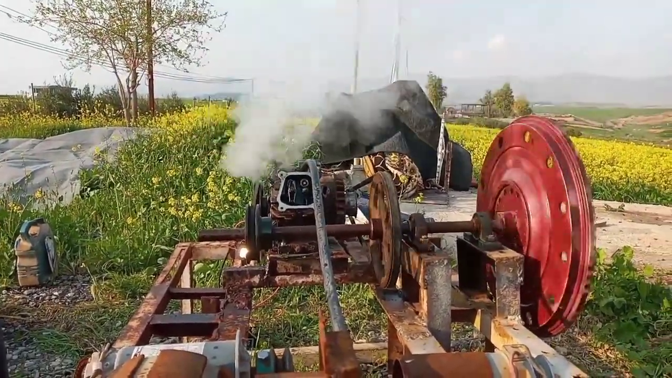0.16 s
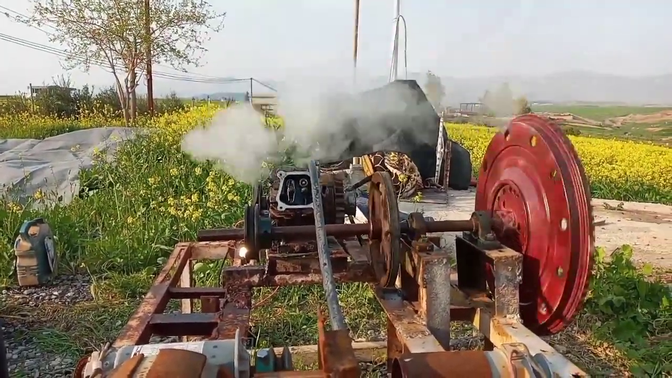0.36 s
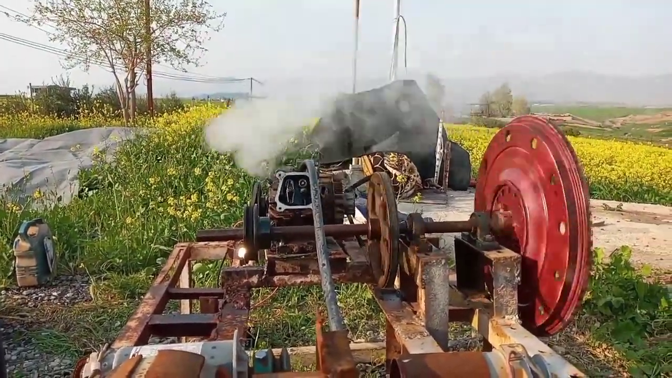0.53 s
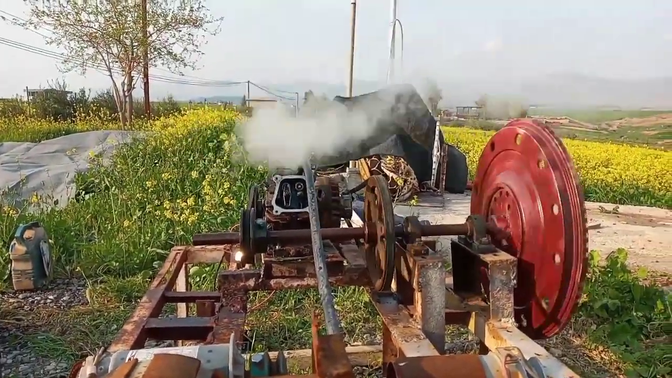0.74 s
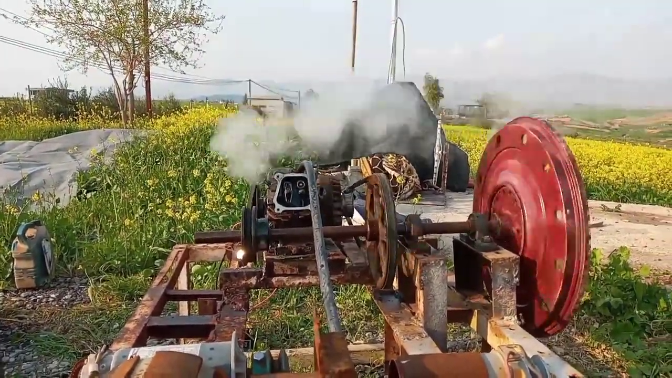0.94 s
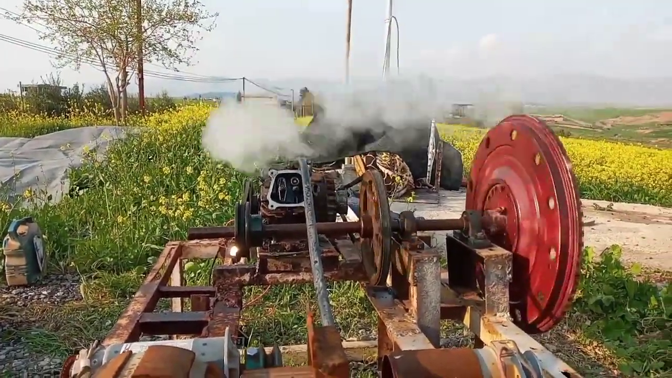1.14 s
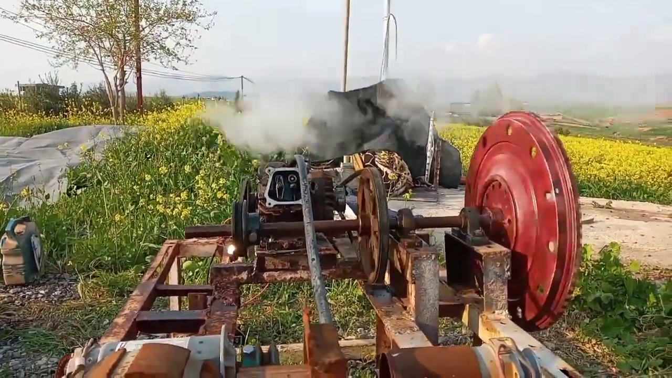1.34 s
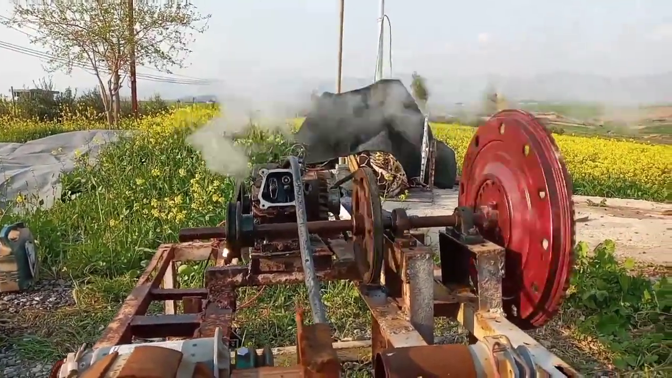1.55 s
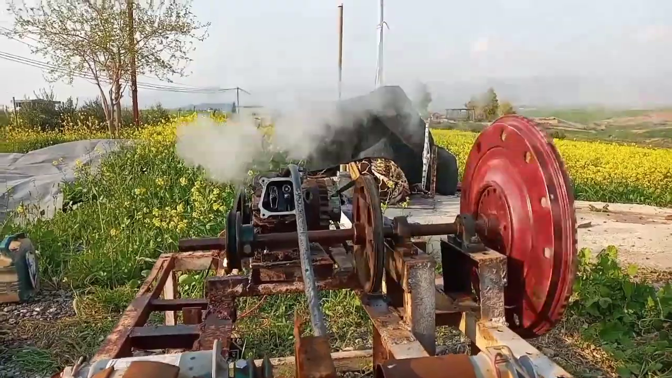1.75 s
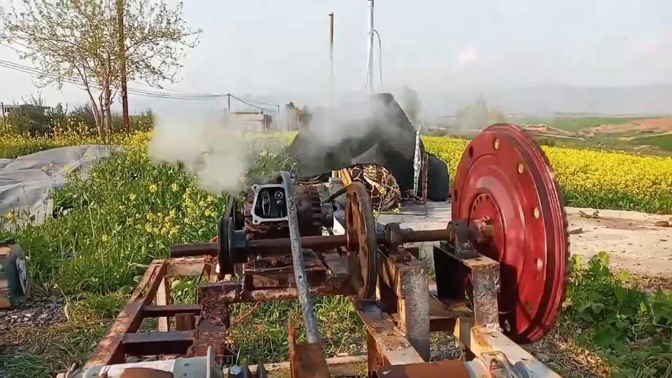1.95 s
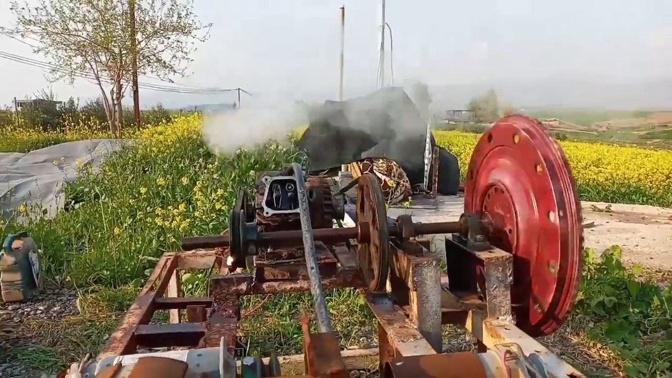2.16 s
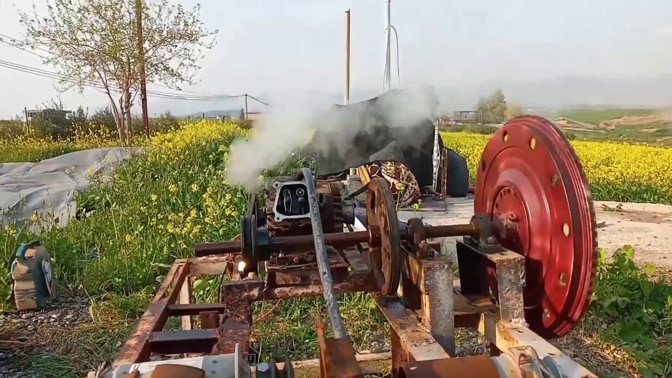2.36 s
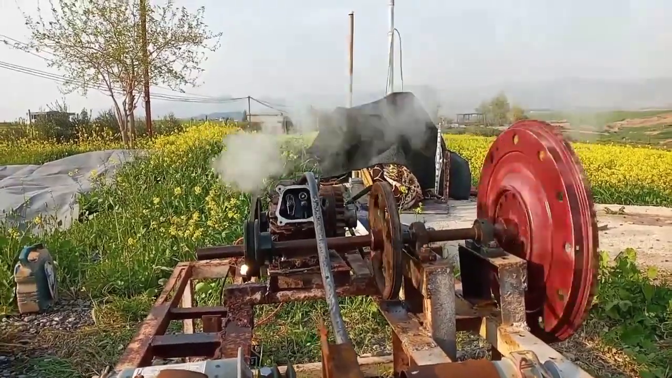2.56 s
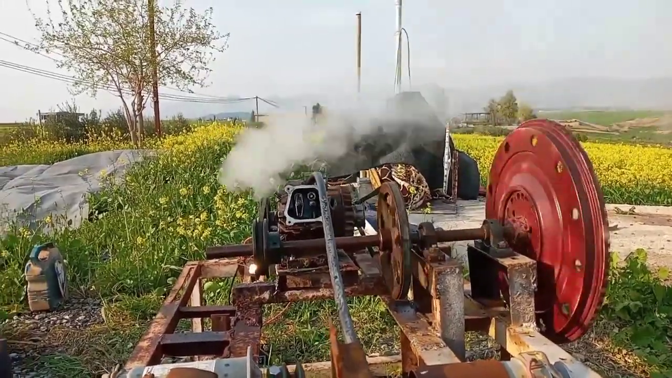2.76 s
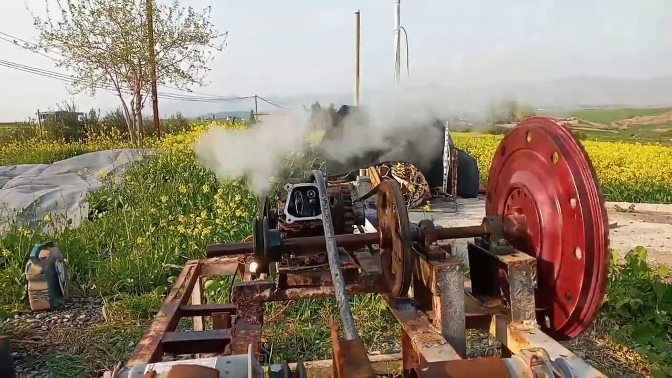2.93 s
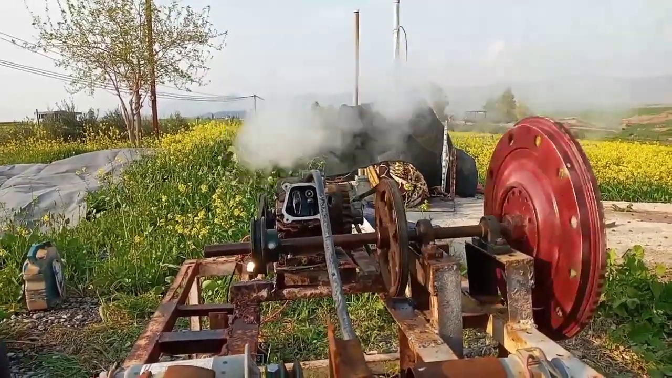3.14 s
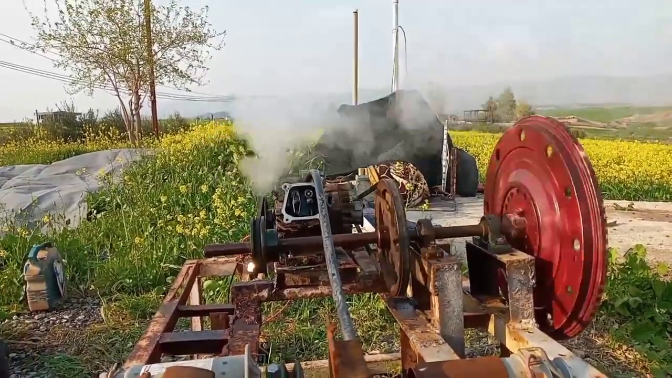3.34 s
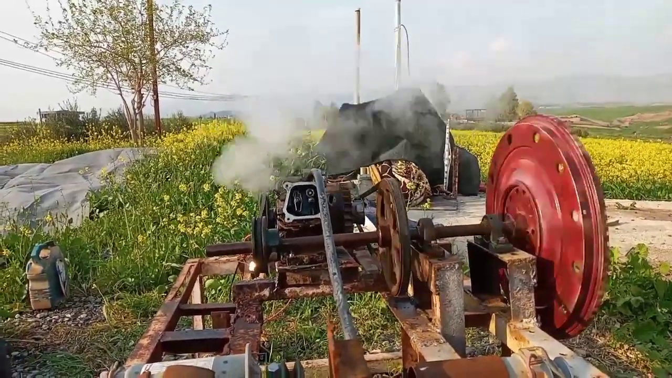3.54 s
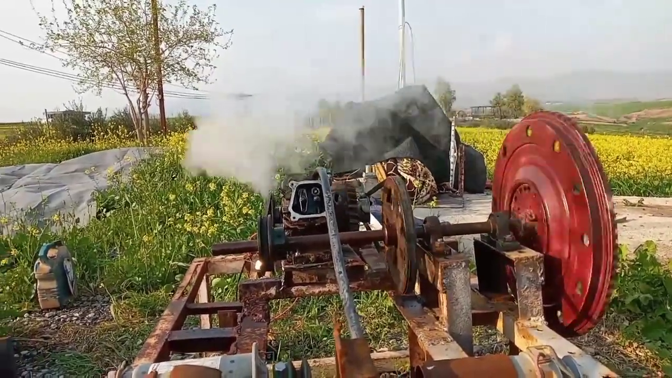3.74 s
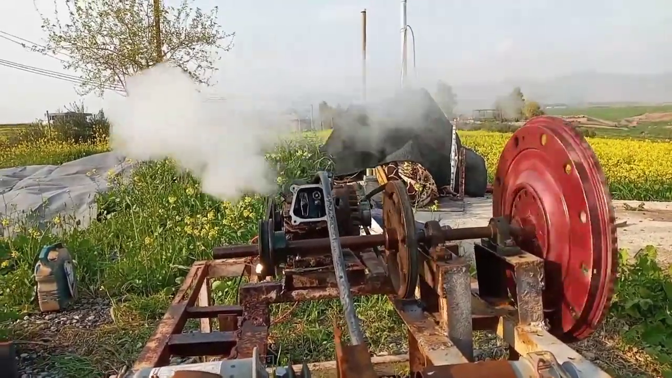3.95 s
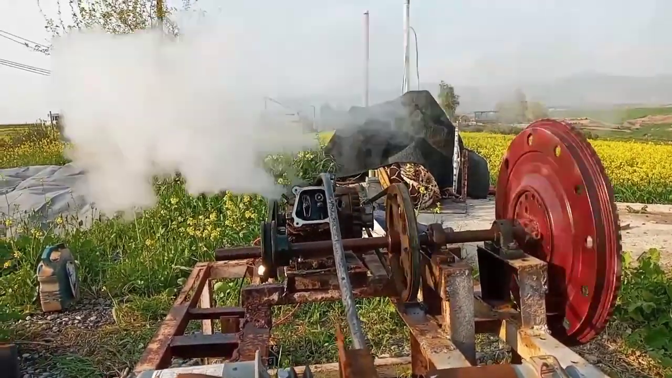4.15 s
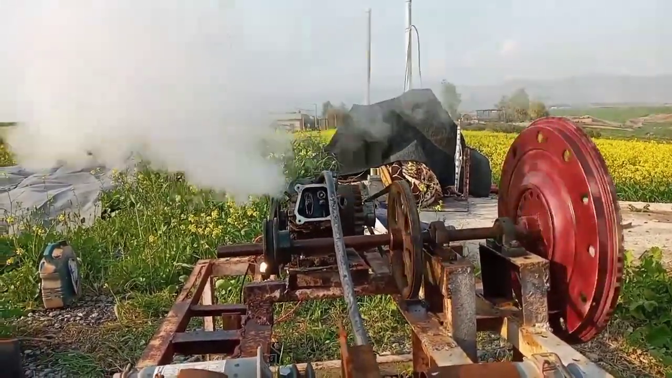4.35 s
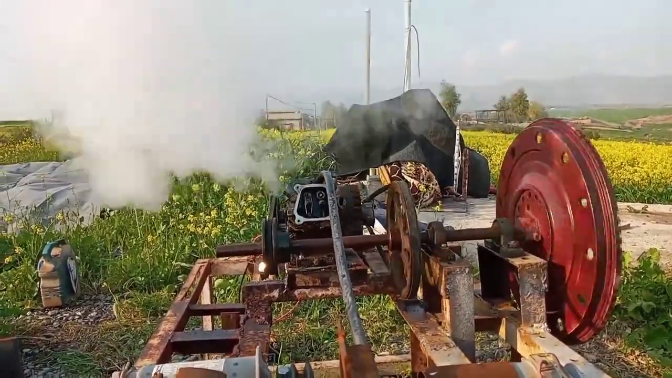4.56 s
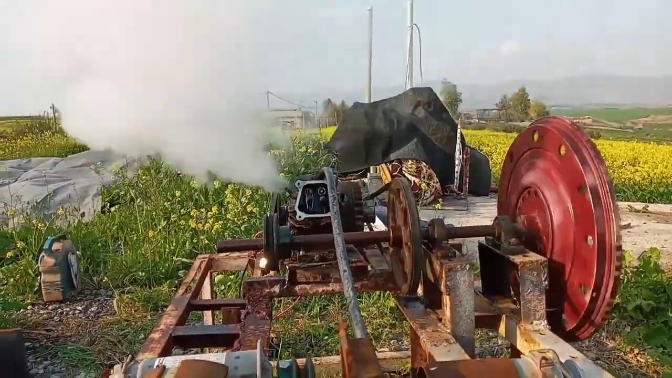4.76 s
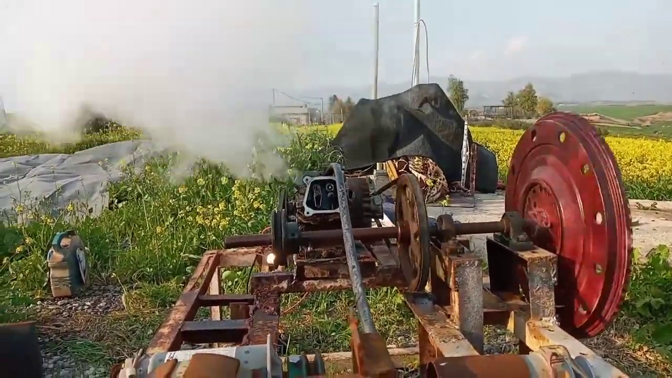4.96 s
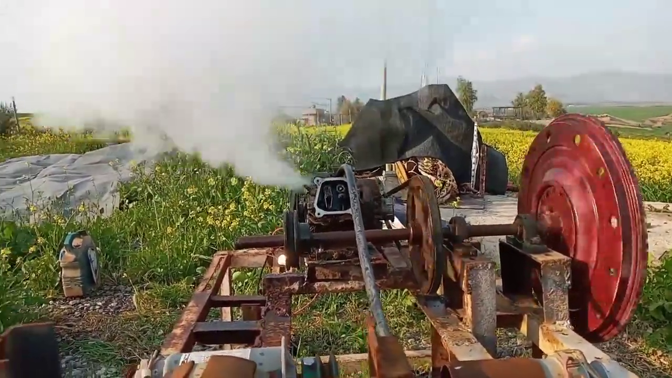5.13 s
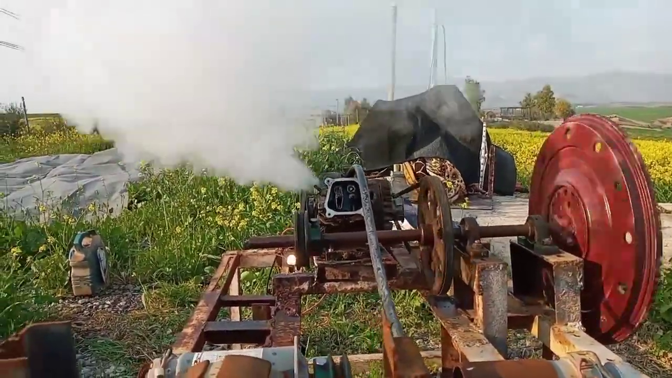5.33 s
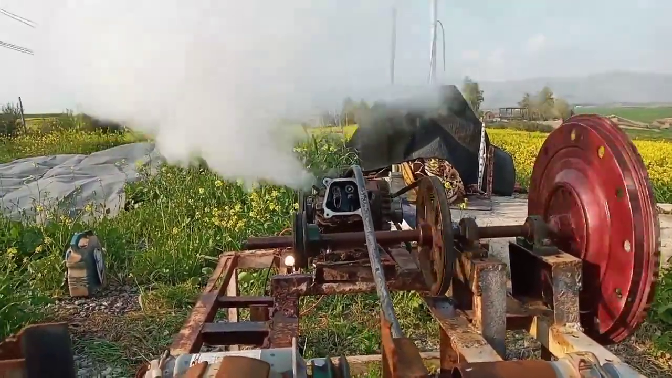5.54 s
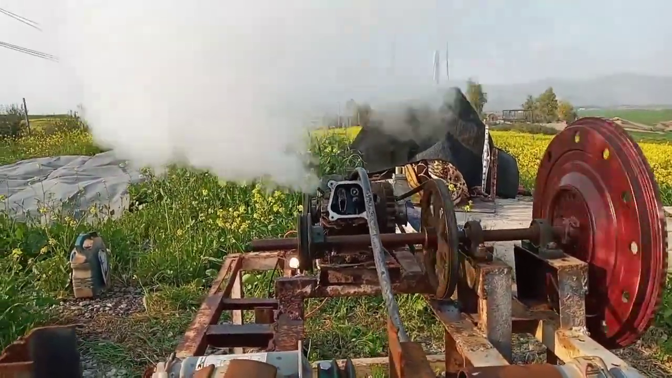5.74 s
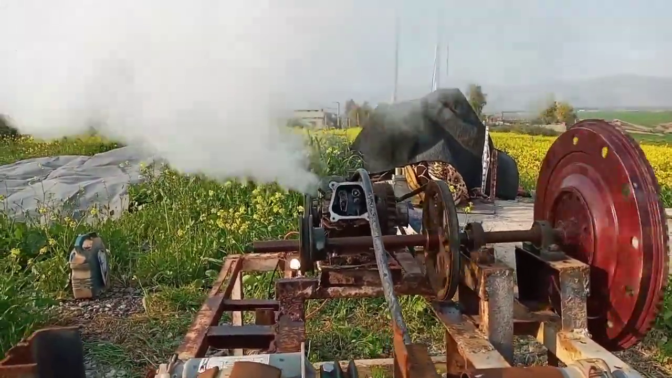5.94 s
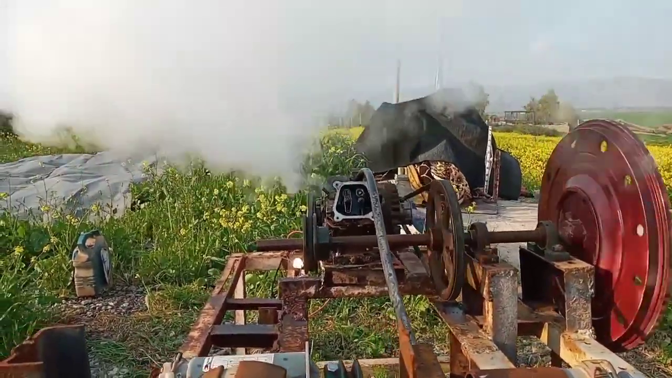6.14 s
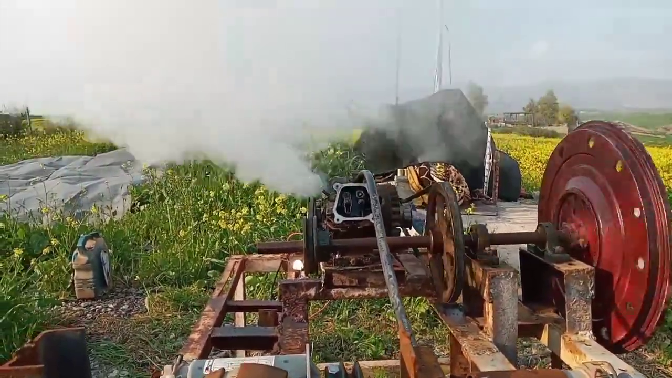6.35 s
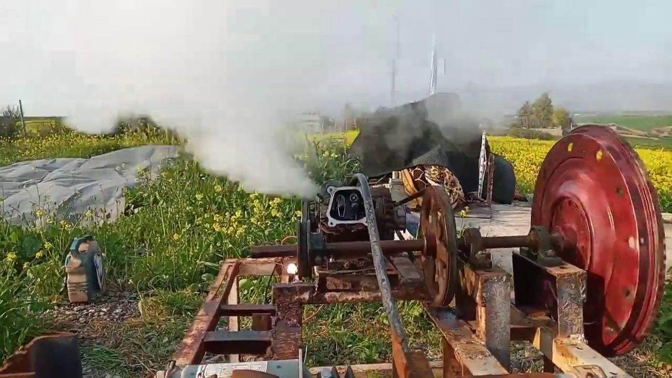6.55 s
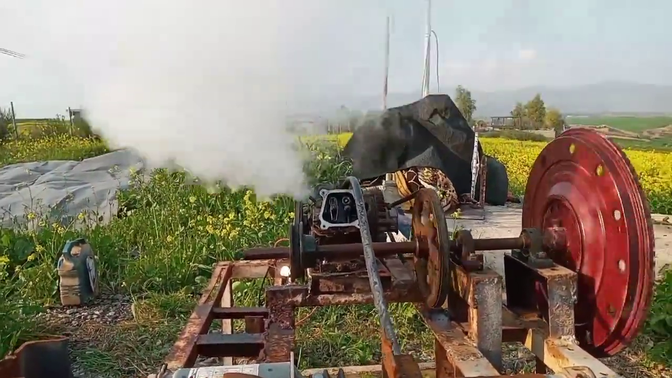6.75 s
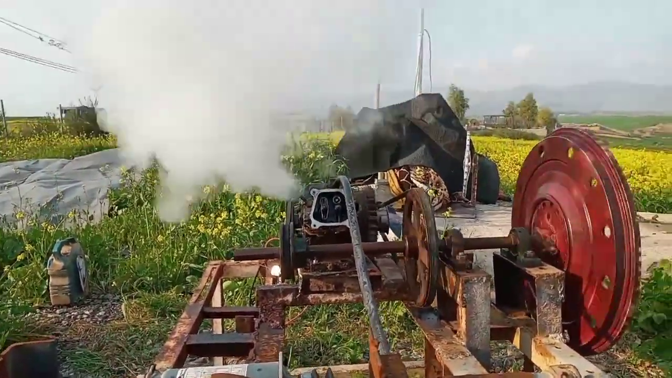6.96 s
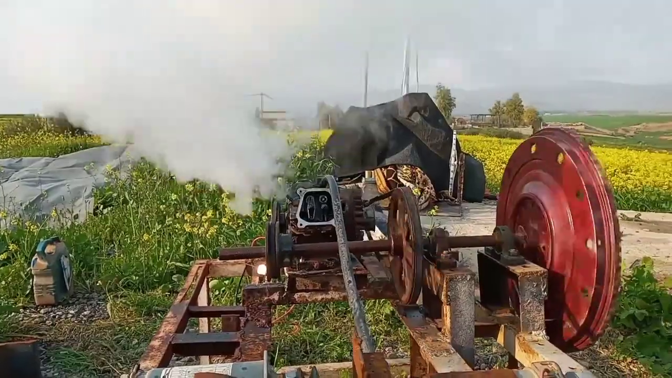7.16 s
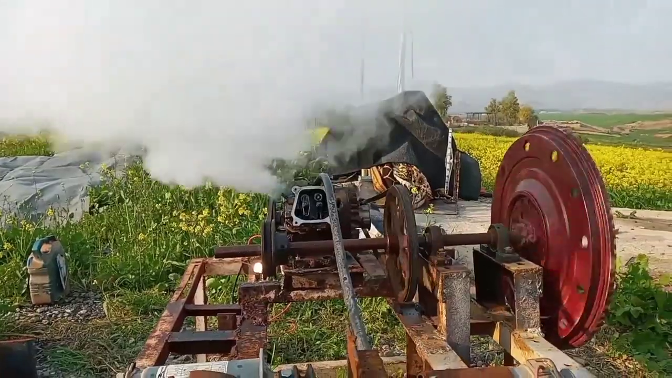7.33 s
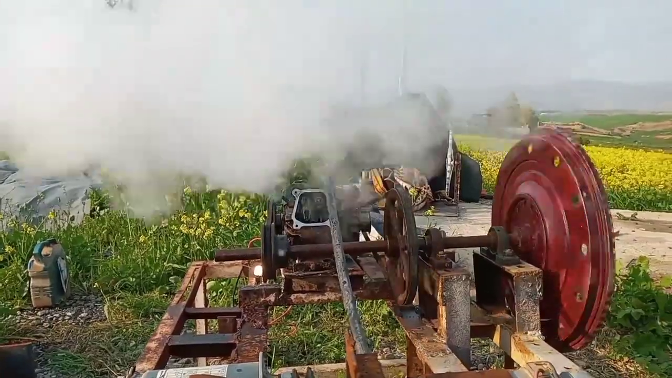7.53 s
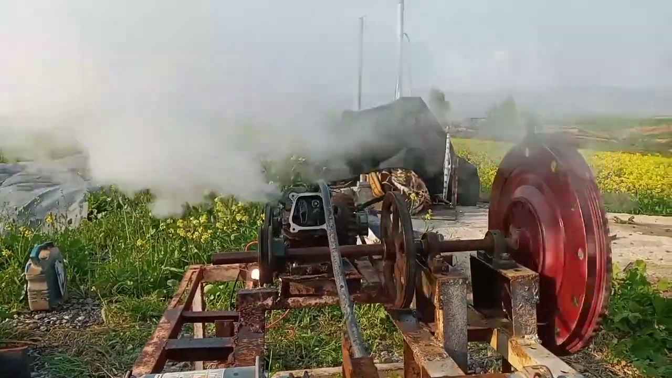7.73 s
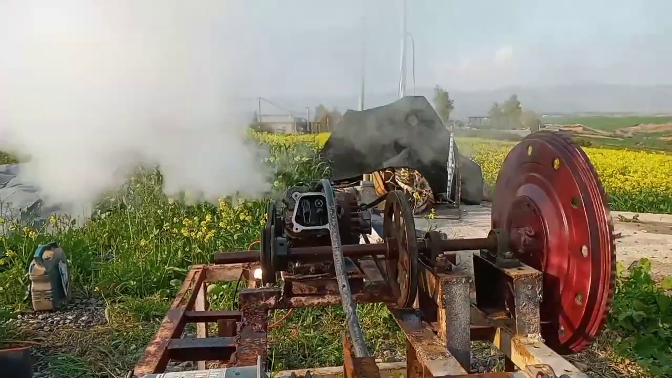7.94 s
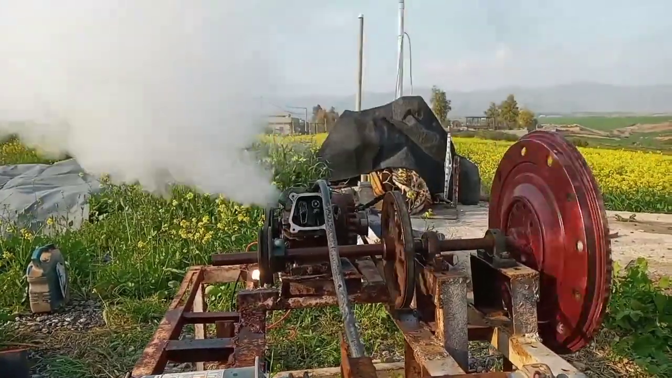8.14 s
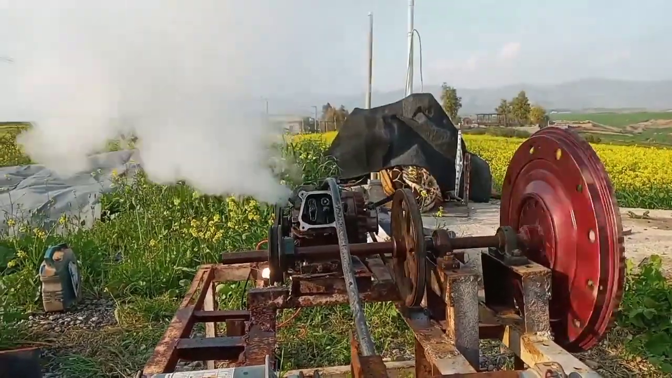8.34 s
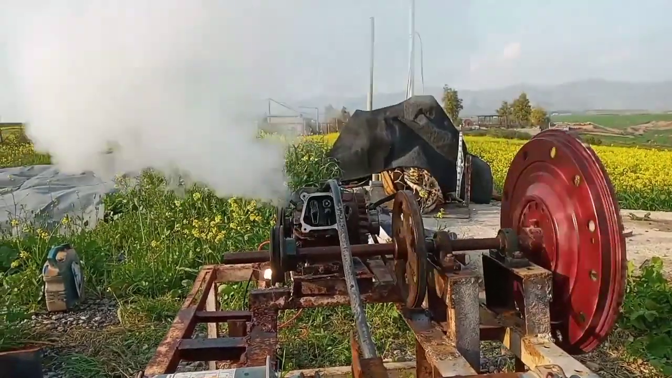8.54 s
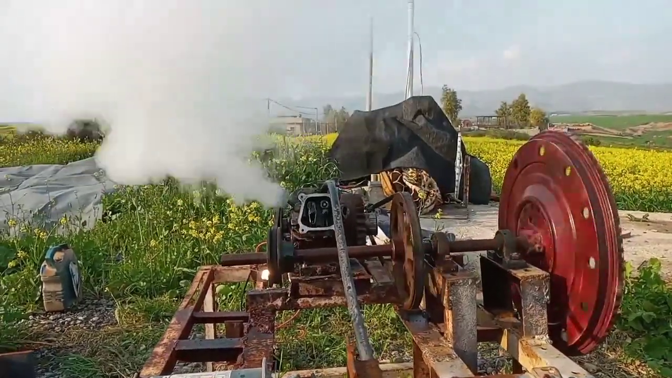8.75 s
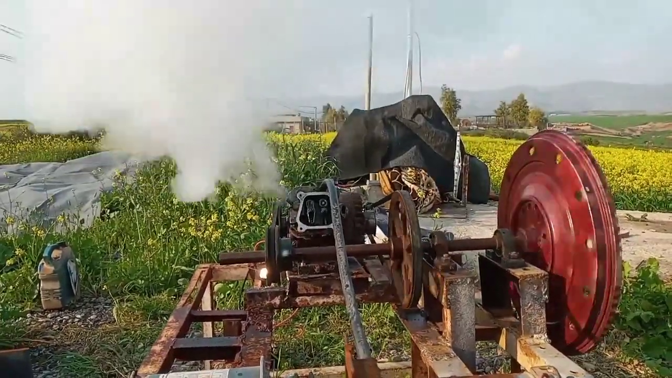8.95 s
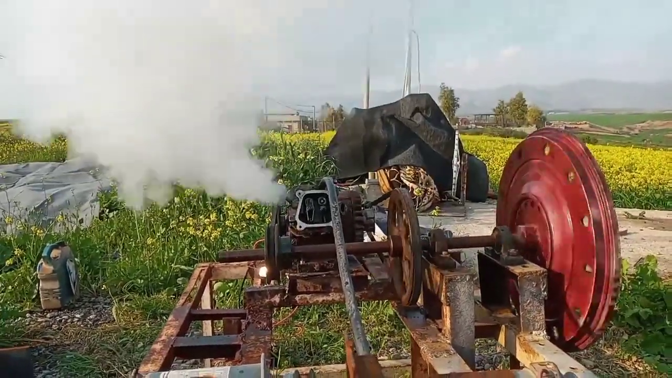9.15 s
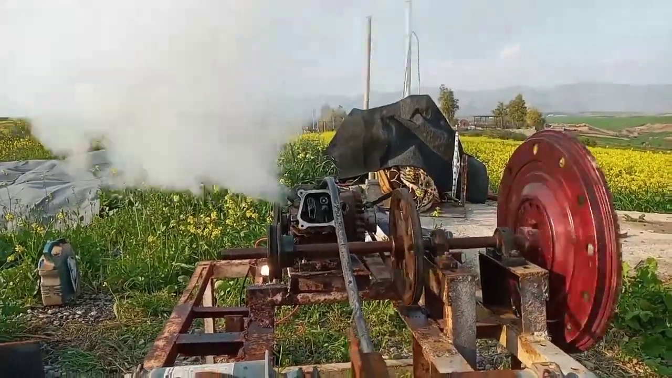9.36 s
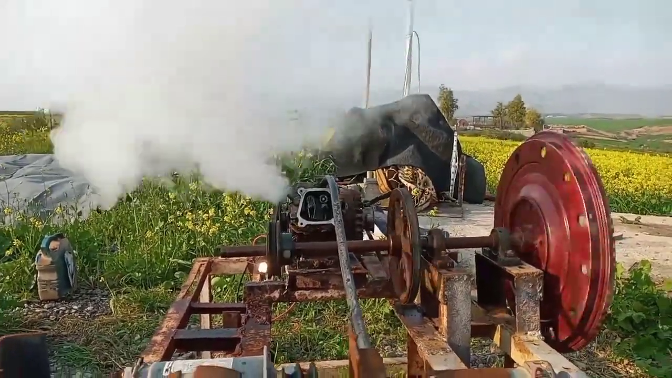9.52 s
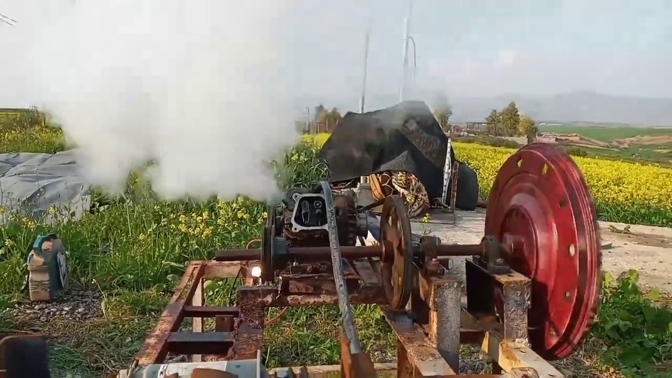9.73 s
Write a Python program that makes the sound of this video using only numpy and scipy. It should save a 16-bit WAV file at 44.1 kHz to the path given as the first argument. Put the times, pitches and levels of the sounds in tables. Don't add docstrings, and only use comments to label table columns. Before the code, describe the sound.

Fast bright bursts of exhaust steam, about six a second, start soft, then jump to a forceful steady roaring chuff in open air.

```python
import sys
import numpy as np
from scipy import signal
from scipy.fft import irfft
from scipy.io import wavfile
from scipy.ndimage import uniform_filter1d, map_coordinates

SR = 44100
rng = np.random.default_rng(int(sys.argv[2]) if len(sys.argv) > 2 else 0)


def file_out(sig):
    cols = np.atleast_2d(sig).T
    lim = np.clip(cols, -1, 1)
    pcm = np.round(lim * 32767).astype(np.int16)
    wavfile.write(sys.argv[1], SR, pcm)


def nominal_scale(level):
    x = np.asarray(level, float) / 20
    return 10 ** x


N = 431738

# time in seconds, turns done.
CRANK = [(-0.263, -1.0), (0.667, 2.0), (1.303, 4.0), (1.797, 5.5), (1.951, 6.0), (3.943, 12.0),
         (4.391, 13.5), (4.525, 14.0), (4.669, 14.5), (5.343, 17.0), (5.734, 18.5), (7.138, 24.0),
         (7.91, 27.0), (8.287, 28.5), (8.658, 30.0), (9.033, 31.5), (9.54, 33.5), (9.907, 35.0)]
# time in seconds, level in dB.
PRESSURE = [
    (0, -21.5),
    (1.1, -22.5),
    (2.2, -22.5),
    (3.62, -22),
    (3.78, -18.5),
    (3.95, -15.5),
    (5, -14),
    (7, -13.5),
    (9.8, -14),
]
IDLE_DB, FULL_DB = -22, -14
# opens at in turns, open for in turns, jet
# over pressure in dB.
VALVE = [
    (0.027, 0.34, 0),
    (0.5, 0.39, -0.5),
]
# opening burst in dB, droop before closing in dB, leak afterwards in dB.
IDLE_STROKES = [
    (2.5, -1.5, -25.5),
    (5.5, -0.3, -25.5),
]
# opening burst in dB, droop before closing in dB, leak afterwards in dB.
FULL_STROKES = [
    (4, -3, -36.5),
    (3.5, -5, -32.5),
]
# open time in turns, then jet, burst, droop and leak in dB.
UNEVEN = (0.0054, 0.4, 1.1, 1.06, 1.1)
# frequency in Hz, left port in dB, right port in dB.
JET_COLOUR = [(60, -5.5, -7.5), (223, -2, -3), (915, 11, 5.5), (1786, 14.5, 8), (2620, 21.5, 19),
              (4300, 19.5, 17.5), (5710, 17, 15.5), (6260, 23.5, 18), (7490, 21.5, 7), (7980, 10, 3.5),
              (11600, 6, 16.5), (14100, -1.5, 4), (14650, 14, 5), (15740, 5, -4)]
# frequency in Hz, at low pressure in dB, in the opening burst in dB,
# per dB of droop in dB.
JET_SHIFTS = [(148, 0.5, 2, 9), (494, 0.5, 3.5, 0), (1020, 5.5, -0.5, 0.5), (1710, -2.5, 7.5, -1.5),
              (2260, -6, 2, -0.5), (2720, 0, -1.5, -0.5), (4470, -0.5, 1.5, 1), (6330, 1, -1.5, 0.57),
              (8300, -5.5, -3, 2), (14000, -1, -2.5, 1.3)]
# frequency in Hz, sagging mid stroke in dB,
# throttled by the closing valve in dB.
THROTTLE = [(500, 1, 2.5), (1400, -6.5, 2.5), (2600, -2.5, 1.5), (6000, 0, 0), (11000, 1, 2.5)]
# frequency in Hz, left port in dB, right port in dB.
LEAK_COLOUR = [(101, -9, -22), (520, 0, 1), (1260, 7, 3.5), (1720, 10, -4), (2440, 5, 0), (4300, 3.5, -1.5),
               (5800, 7.5, 3), (7940, 13.5, 1.5), (8200, 5, -1), (10500, 0, 7), (11730, -10, 0.5),
               (13000, -14, -15), (15200, 1, -5), (15750, -8.5, -14)]
# frequency in Hz, width in Hz, left depth in dB,
# right depth in dB.
NOTCHES = [(660, 150, 6, 6), (1110, 100, 5, 4), (1350, 150, 2, 5), (1900, 170, 8, 6), (2380, 100, 5, 3),
           (2910, 120, 10, 10), (3420, 150, 4, 3), (3750, 150, 6, 5), (4500, 250, 5, 6), (5050, 300, 6, 5),
           (5950, 150, 4, 2), (6750, 250, 7, 2), (8050, 450, 5, 28), (15530, 220, 10, 25)]
# frequency in Hz, likeness from 0 to 1, extra phase lead of the left port in radians.
PORT_LIKENESS = [(100, 0.4, -0.1), (443, 0.88, 0.36), (740, 0.77, 0.22), (1630, 0.58, -0.24),
                 (2600, 0.68, -0.42), (3600, 1, 0), (5600, 0.72, -0.35), (7300, 0.34, 0.14), (8200, 0.2, 3),
                 (9400, 0.47, 3), (11900, 0.8, 3.5), (15000, 0.3, 3)]
LAG_S = 44 / SR
# time in seconds, extra lag of the left port in microseconds.
SWAY = [(0.15, -1), (0.9, 2), (1.8, 17), (2.55, -5), (3.4, -10), (4.65, -14), (5.25, -35), (6.15, -46),
        (6.75, -38), (7.35, -14), (9.8, -18)]
# peak in seconds, length in seconds, level in dB, left minus right in dB.
GUSTS = [(0.056, .05, -32.5, 10), (0.104, 0.029, -25, -19), (0.22, 0.088, -25, -23),
         (0.337, 0.052, -36.5, 19), (0.55, 0.1, -40, 9), (0.7, 0.073, -43, -3), (0.86, .1, -37, 3),
         (0.988, 0.051, -29.5, 16), (1.275, 0.17, -48, 11), (1.552, 0.07, -36, 22),
         (1.784, 0.21, -34.5, 17), (1.937, 0.12, -38.5, 25), (2.116, 0.092, -32, 8), (2.285, 0.19, -38, 9),
         (2.5, 0.14, -33, 9), (2.8, 0.075, -46, 6), (3.1, 0.088, -44, 15), (3.283, 0.1, -39.5, 14),
         (3.44, 0.048, -27, 3), (3.65, .3, -39.5, 4), (4.24, 0.099, -44, -16), (4.673, .08, -41, 10),
         (5.114, 0.028, -26, -14), (5.184, 0.047, -31, -23), (5.333, 0.42, -35, -16.5),
         (5.6, 0.56, -44, -10), (6.01, 0.049, -33, -3), (6.13, .07, -40, -12), (7.3, 0.053, -42, -4),
         (8.08, .06, -38, -7)]
# frequency in Hz, left port in dB, right port in dB.
GUST_COLOUR = [(28, -42, -42), (50, -26, -20), (64.6, 1.5, -3.5), (94, 6, -1.5), (146, -1, 0),
               (307, -13.5, -8), (590, -35, -22.5), (1500, -70, -61)]


def strokes():
    s, turns = np.transpose(CRANK)
    side = np.arange(1, 2 * round(turns[-1] - turns[0])) % 2
    turn = turns[0] + np.arange(1, len(side) + 1) // 2
    opens, open_for, over_db = np.transpose(VALVE)[:, side]
    luck = UNEVEN * rng.standard_normal((len(side), len(UNEVEN)))
    start = np.interp(turn + opens, turns, s)
    end = np.interp(turn + opens + open_for + luck[:, 0], turns, s, right=N / SR + 1)
    level_db = np.interp(start, *np.transpose(PRESSURE))
    load = np.clip((level_db - IDLE_DB) / (FULL_DB - IDLE_DB), 0, 1)[:, None]
    idle_db = (1 - load) * np.array(IDLE_STROKES)[side]
    full_db = load * np.array(FULL_STROKES)[side]
    shape_db = idle_db + full_db + luck[:, 2:]
    return np.column_stack([start, end - start, level_db + over_db + luck[:, 1], shape_db])


def jet(rows):
    s, span, level_db, burst_db, droop_db, _ = np.transpose(rows)[:, :, None]
    end = s + span
    times = np.hstack([s - 0.006, s + 0.0042, s + 0.58 * span,
                       end - 0.018, end - 0.008, end + 0.0013, end + 0.0073])
    valve_db = joined(times, level_db + [-36.0, 0, 0.5, 1.5, -1.0, -7.5, -56])
    droop = joined(times, droop_db * [0.16, 0, 0.0058, 0.57, 0.45, 0.71, 1.1])

    peak = np.hstack([s, s + 0.0083, s + 0.013, s + 0.027])
    burst = joined(peak, [0.52, 0.95, 1.0, 0.11] + 0 * s)
    surge_db = joined(peak, burst_db * [0.32, 0.95, 0.68, 0.081])

    slack = np.clip(joined(s, (-12.5 - level_db) / 6), 0, 1.3)
    late = s + span * [0.3, 0.5, 0.7, 0.9, 1]
    sag = slack * joined(late, [0, 1, 1, 0, 0] + 0 * s)
    squeeze = slack * joined(late, [0, 0, 0, 1, 0] + 0 * s)
    controls = np.array([slack, burst * (1 + 0.91 * slack), droop, sag, squeeze])

    def moving_colour(hz, at):
        shifts = np.vstack([along(JET_SHIFTS, hz), along(THROTTLE, hz)])
        return shifts.T @ controls[:, at]

    spurts_db = 0.61 * wobble(60) + 0.48 * wobble(400)
    level = nominal_scale(valve_db + droop + surge_db + spurts_db - 10.5)
    roar = level * patchy_noise(2.98, 1.38, moving_colour)
    return ports(roar, JET_COLOUR, alike_share=1.0, notch_share=1)


def pipe(rows):
    s, span, level_db = np.transpose(rows)[:3, :, None]
    idle = np.clip((FULL_DB - level_db) / (FULL_DB - IDLE_DB), 0, 1)
    times = s + span * ([0.1, 0.45, 0.62, 0.85] + idle * [-0.08, -0.28, 0, 0.05])
    swell_db = joined(times, [-20, 1.5, 1, -22] + idle * [5, -1, -2, 5])

    def resonance(hz):
        damping = 1j * hz * 190
        return (damping / (465 ** 2 - hz ** 2 + damping)) ** 2

    drone = filtered(rng.standard_normal(N), resonance)
    drone = unit(drone) * nominal_scale(swell_db - 32.5 + 2.0 * wobble(7.6))
    return np.array([np.roll(drone, round(LAG_S * SR)) * nominal_scale(3), drone * nominal_scale(-0.5)])


def leak(rows):
    s, span, *_, leak_db = np.transpose(rows)
    escaping = nominal_scale(1.0 * wobble(40)) * patchy_noise(3.4, 0.99)
    hiss = unit(ports(escaping, LEAK_COLOUR, alike_share=0.92, notch_share=0.52))
    return nominal_scale(joined(s + span + 0.01, leak_db) + 2.5) * hiss


def wind():
    t = np.arange(0, N / SR + 0.01, 0.002)
    s, length, level_db, pan_db = np.transpose(GUSTS)[:, :, None]
    bells = np.exp(-4 * ((t - s) / length) ** 2)
    power = [joined(t, np.sum(nominal_scale(2 * level_db + way * pan_db) * bells, axis=0)) for way in (1, -1)]
    breeze = nominal_scale(-52 + 5 * np.array([wobble(12), wobble(9)]))
    lumps = nominal_scale(3 * np.array([wobble(25), wobble(25)]))
    noise = filtered(rng.standard_normal((2, N)), lambda hz: nominal_scale(along(GUST_COLOUR, hz)))
    rumble = unit(lumps * noise)
    return rumble * np.sqrt(nominal_scale(-4.5) * np.array(power) + breeze ** 2)


def ports(pair, spectrum, alike_share, notch_share):
    def response(hz):
        alike, lead = along(PORT_LIKENESS, hz)
        turn = np.arccos(np.clip(alike_share * alike, 0, 1)) / 2
        dips = sum(np.outer([left, right], 1 / (1 + (2 * (hz - centre) / width) ** 2))
                   for centre, width, left, right in NOTCHES)
        delay = [np.exp(1j * (lead - 2 * np.pi * hz * LAG_S)), hz * 0 + 1]
        colour = nominal_scale(along(spectrum, hz) - notch_share * dips) * delay
        shared, separate = np.cos(turn), np.sin(turn)
        return colour[:, None] * [[shared, separate], [shared, -separate]]
    return filtered(pair[None], response).sum(axis=1)


def swayed(x):
    hz, t, z = signal.stft(x[0], SR, nperseg=512)
    share = np.where(hz < 8000, 1, 0.3)
    lag_s = np.outer(share, np.interp(t, *np.transpose(SWAY))) / 1e6
    delayed = z * np.exp(-2j * np.pi * hz[:, None] * lag_s)
    return np.array([signal.istft(delayed, SR, nperseg=512)[1][:N], x[1]])


def patchy_noise(streak_db, blotch_db, shift_db=lambda hz, at: 0):
    streaked = patches(rng.standard_normal((2, N)), size=1024, depth_db=streak_db)
    return patches(streaked, size=256, depth_db=blotch_db, shift_db=shift_db)


def patches(x, size, depth_db, shift_db=lambda hz, at: 0):
    hz, t, z = signal.stft(x, SR, nperseg=size)
    field = uniform_filter1d(rng.standard_normal(z.shape[1:]), size=3, axis=0)
    field = uniform_filter1d(field, size=5, axis=1)
    at = np.minimum(np.round(t * SR).astype(int), N - 1)
    gain = nominal_scale(depth_db * unit(field) - depth_db ** 2 / 9 + shift_db(hz, at))
    return signal.istft(z * gain, SR, nperseg=size)[1][:, :N]


def filtered(x, response):
    kernel = np.fft.fftshift(irfft(response(np.fft.rfftfreq(4096, 1 / SR))), axes=-1)
    return signal.oaconvolve(x, kernel, axes=-1)[..., 2048:2048 + N]


def along(table, hz):
    f, *cols = np.transpose(table)
    return np.array([np.interp(np.log(hz + 1), np.log(f + 1), c) for c in cols])


def joined(times, values):
    return np.interp(np.arange(N) / SR, np.ravel(times), np.ravel(values))


def wobble(rate):
    knots = rng.standard_normal(int(N * rate / SR) + 4)
    return map_coordinates(knots, [np.arange(N) * rate / SR])


def unit(x):
    return x / np.sqrt(np.mean(x ** 2) + 1e-20)


def scene():
    rows = strokes()
    engine = jet(rows) + pipe(rows) + leak(rows)
    return swayed(engine) + wind()


def top_cut(x):
    return signal.sosfilt(signal.butter(12, 15780, fs=SR, output="sos"), x)


def record(dry):
    x = filtered(dry, lambda hz: [hz < 15780])
    x = x / (1 + np.abs(x / 1.3) ** 8) ** (1 / 8)
    return top_cut(x)


dry = scene()
out = record(dry)
file_out(out)
```